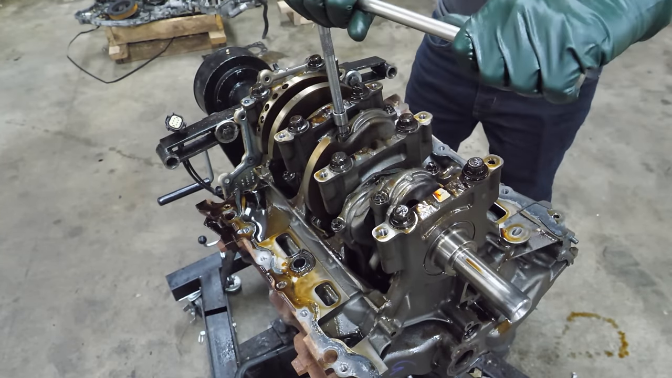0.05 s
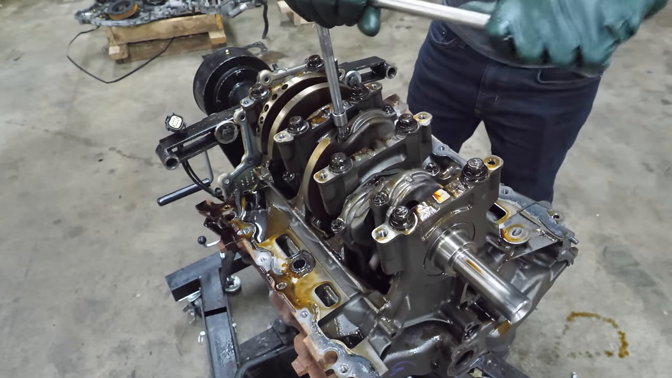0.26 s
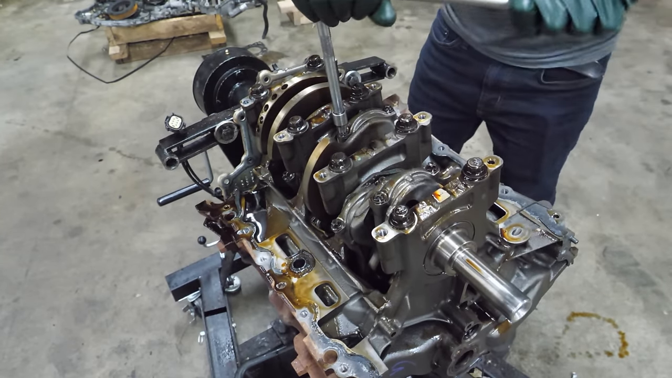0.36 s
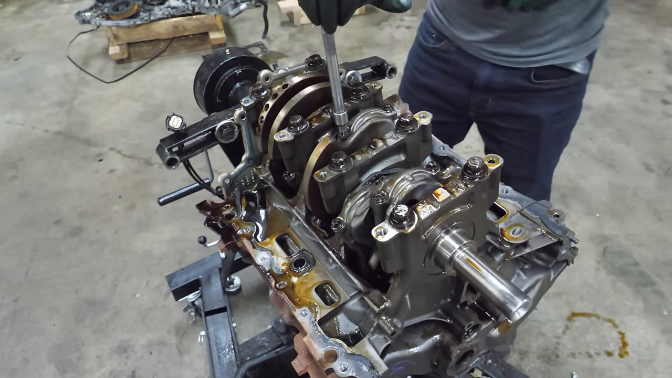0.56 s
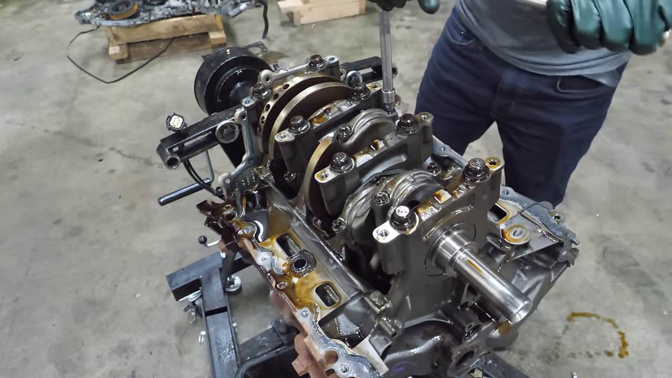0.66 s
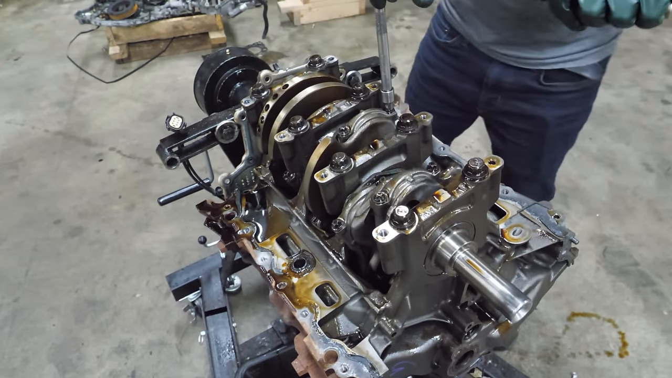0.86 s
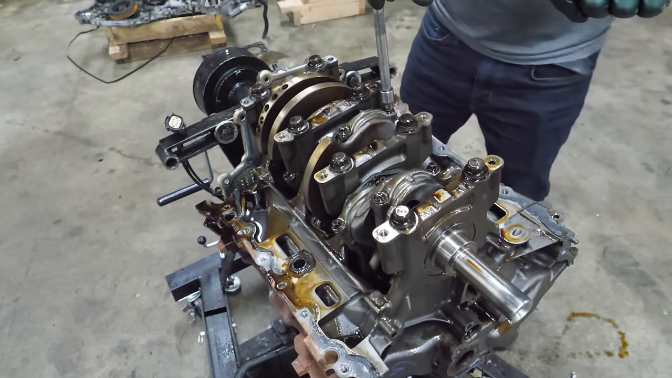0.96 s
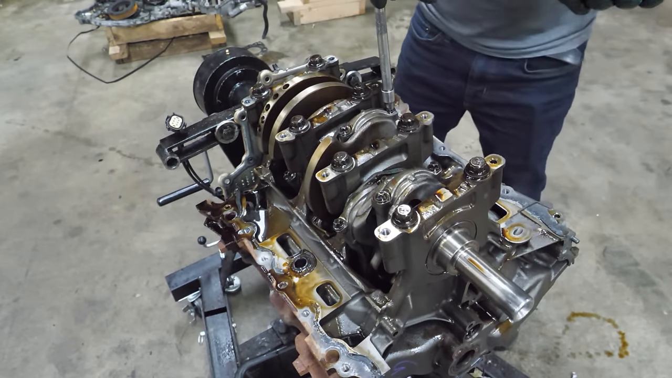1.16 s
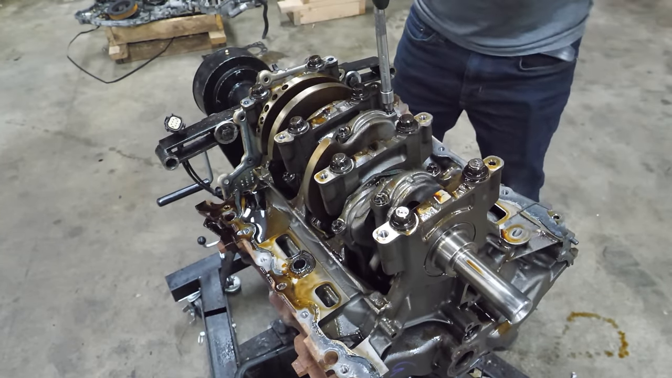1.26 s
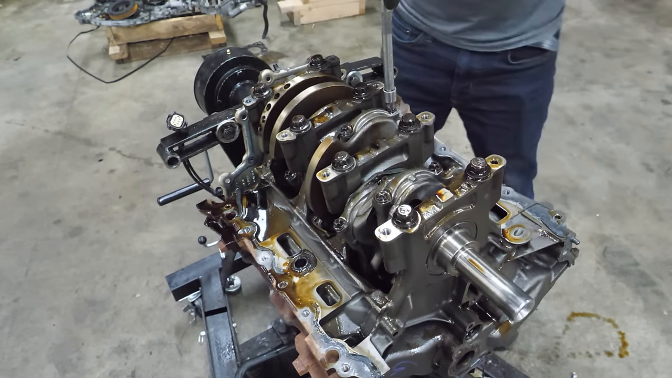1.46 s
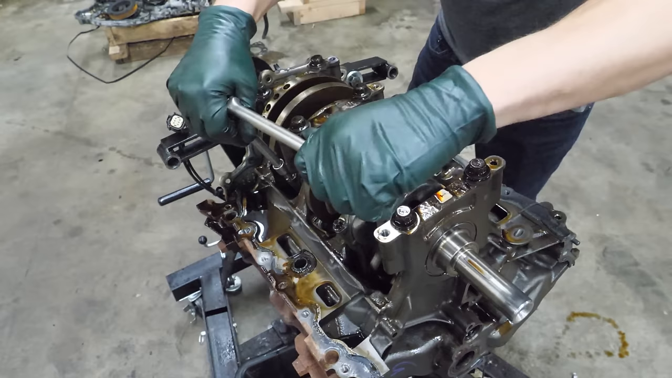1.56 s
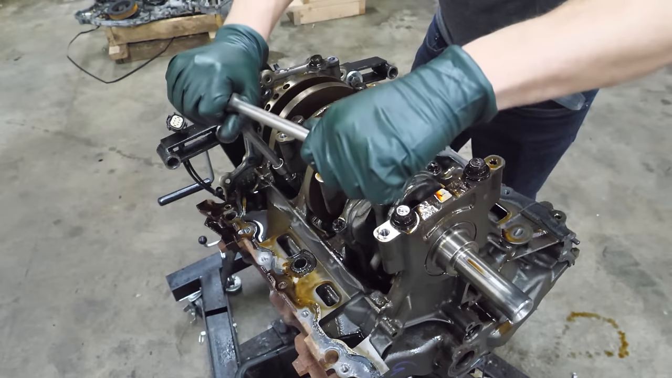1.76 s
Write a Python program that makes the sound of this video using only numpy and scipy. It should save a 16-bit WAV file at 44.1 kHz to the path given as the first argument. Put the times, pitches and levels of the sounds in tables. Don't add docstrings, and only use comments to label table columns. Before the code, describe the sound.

Tight engine bolts break loose with three abrupt metallic cracks, one early and two close together around one second; light socket ticks come between, close up in a bare concrete workshop with a bright ringing echo.

```python
import sys
import numpy as np
from scipy import signal
from scipy.fft import rfft, irfft
from scipy.io import wavfile
from scipy.ndimage import uniform_filter1d

SR = 44100
rng = np.random.default_rng(int(sys.argv[2]) if len(sys.argv) > 2 else 0)


def invert_db(x):
    u = np.asarray(x, float) / 20
    return 10 ** u


def file_out(sig):
    cols = np.atleast_2d(sig).T
    lim = np.clip(cols, -1, 1)
    pcm = np.round(lim * 32767).astype(np.int16)
    wavfile.write(sys.argv[1], SR, pcm)


N = 79380

# (t/s, ring level/dB, snap level/dB, thump level/dB)
CRACKS = [
    (0.2361, -30.5, -11.5, -24),
    (0.919, -34.5, -16, -15),
    (1.1964, -34, -15, -21),
]
# (rise t/s, fall t60/s)
SLIP_BURSTS = [
    (0.0042, .018),
    (0.003, 0.017),
    (0.0021, 0.023),
]
# (f/Hz, width/Hz, level/dB)
FIRST_STEEL = [(1100, 200, -3), (2368, 270, -11), (3650, 470, 1), (4780, 120, -15), (5020, 110, -1.5),
               (5820, 83, 5), (7000, 100, -7.5), (7170, 40, -15), (10500, 91, -17.5), (11030, 180, -25.5),
               (13200, 240, -24)]
SECOND_STEEL = [(2290, 410, -7), (3430, 40, 12), (4020, 260, -10), (4880, 100, 7.5), (6030, 83, -14),
                (6600, 420, -0.5), (7880, 110, -9), (8370, 110, 3.5), (10700, 190, -18), (10800, 200, -23),
                (12100, 130, -21)]
THIRD_STEEL = [(2087, 110, -6), (4045, 73, -7.5), (4620, 69, -10), (5840, 75, 1.5), (6800, 250, -9),
               (7020, 70, -19), (7300, 83, -14.5), (8630, 150, 5), (9100, 140, -39.5), (11000, 260, -4),
               (12670, 150, -39)]
# (f/Hz, width/Hz, level/dB)
BODY_MODES = [
    [(440, 67, -14.5), (3100, 100, -16.5)],
    [(1590, 380, -11), (815, 300, -19)],
    [(3310, 450, -9.5), (420, 200, -17)],
]
# (f/Hz, level/dB)
STEEL_SHEEN = [(7000, 0.7), (9500, -2), (16000, -10)]
# (f/Hz, level/dB)
SNAP_COLOURS = [
    [(290, -37), (500, -11), (2850, -20.5), (3490, -6), (5880, 1.5), (8450, -28.5), (16000, -31.5)],
    [(290, -32), (500, -2.5), (2730, -6), (4940, 1.5), (8700, -8.5), (14900, -19.5), (16000, -26.5)],
    [(290, -38), (500, -10.5), (2570, -13.5), (5800, 2), (7530, -9.5), (8700, -7), (16000, -44)],
]
TICK_TIMES = [
    .6135,
    .771,
    .772,
    .783,
    .8,
    .8415,
    .8415,
    .8555,
    .8555,
]
# (level/dB, centre f/Hz, width/Hz, t60/s)
TICK_TONES = [
    (-45, 3800, 2000, 0.0085),
    (-45.5, 4800, 3200, 0.041),
    (-51.5, 470, 250, 0.025),
    (-49.5, 3850, 2800, 0.058),
    (-60, 2500, 8200, 0.3),
    (-53, 2700, 900, 0.013),
    (-60, 6300, 2300, 0.024),
    (-42, 6200, 6300, .004),
    (-49, 550, 370, 0.023),
]
SCENE_CHANGES = [.62, .912, 1.572]
# (f/Hz, level/dB)
WALL_COLOUR = [(59, -41.5), (100, -11.5), (358, -21.5), (1870, -7.5), (2370, -15.5), (5530, -3),
               (10000, -27.5), (14100, -32), (16000, -51.5)]
# (f/Hz, t60/s)
WALL_DECAY = [(150, 0.28), (500, 0.88), (1100, 0.67), (2500, 0.91), (5500, 0.67), (8000, 0.64),
              (13000, 0.28)]
# (f/Hz, width/Hz, level/dB)
BLOCK_MODES = [(1881, 210, -14.5), (2198, 22, -11.5), (3340, 440, 0), (4820, 50, -1.5), (5570, 220, 5),
               (6790, 77, -4.5)]
# (f/Hz, depth/dB)
ECHO_PATCHES = [(3000, 2), (7500, 2.5), (9000, 7.5), (16000, 9.5)]
ECHO_LEVELS = [-37.5, -39, -40]
ECHO_MIDS = [-2, 0, -5, -0.5]
ECHO_LOWS = [-3, 0, 6, 7]
# (f/Hz, level/dB)
AIR_COLOUR = [(15, -25), (25, -16), (55, -6), (229, 0.5), (575, -8.5), (1790, -11), (2110, -15),
              (3080, -11), (16000, -18)]
# (t/s, level/dB)
AIR_LEVELS = [(0, -5), (0.621, -6.7), (.9, -14.5), (1.573, -5), (1.575, -14), (1.681, -4.5), (1.8, -3)]
# (f/Hz, level/dB)
SIDE_SHARE = [(60, -27), (1000, -23.5), (6000, -26), (8500, -6), (15000, -15.5)]
# (f/Hz, level/dB)
SIDE_AIR_COLOUR = [(25, 4), (900, -3.5), (7300, -4.5), (7900, -35.5), (16000, -42)]


def evened(x):
    return x / np.sqrt(np.mean(x ** 2) + 1e-20)


def read(points, hz):
    f, value = np.transpose(points)
    return np.interp(np.log(hz + 1), np.log(f + 1), value)


def coloured(x, points):
    gain = invert_db(read(points, np.fft.rfftfreq(len(x), 1 / SR)))
    return irfft(rfft(x) * gain, len(x))


def resonate(x, hz, width):
    turn = np.exp(2j * np.pi * hz * np.arange(len(x)) / SR)
    r = np.exp(-np.pi * width / SR)
    return 2 * (turn * signal.lfilter([1 - r], [1, -r], x / turn)).real


def add(mix, s, sound):
    start = round(s * SR)
    end = min([round(c * SR) for c in SCENE_CHANGES if c > s] + [N])
    sound = sound[max(-start, 0):]
    part = mix[max(start, 0):end][:len(sound)]
    fade_out = np.minimum(np.arange(len(part))[::-1] / 90, 1)
    part += sound[:len(part)] * fade_out


def crack(row, slips, steel, colour):
    s, ring_db, snap_db, thump_db = row
    rise_s, fall_t60 = slips
    creak_s, creak_db = 0.0034, -32.5
    narrowest_hz = 110
    t = np.arange(round(.2 * SR)) / SR - creak_s
    creak = invert_db(creak_db) * (1 + t / creak_s) * (t < rise_s)
    fall = invert_db(-60 * np.maximum(t - rise_s, 0) / fall_t60)
    shape = (np.clip(t / rise_s, 0, 1) + creak) * fall
    jolts = rng.standard_normal((2, len(t)))
    drive = shape * jolts[0] * (rng.random(len(t)) < .4)
    ring = 0
    for hz, width, db in steel:
        mode = evened(resonate(drive, hz, max(width, narrowest_hz)))
        ring = ring + invert_db(db) * np.sqrt(width) * mode
    ring = coloured(evened(ring), STEEL_SHEEN)
    snap = shape * evened(coloured(jolts[1], colour))
    blow = thump(np.maximum(t, 0))
    return s - creak_s, invert_db(ring_db) * ring + invert_db(snap_db) * snap + invert_db(thump_db) * blow


def thump(t):
    dip_s, dip_db, push_s = 0.0011, 5.5, 0.0013
    swing_hz, swing_q = 36, 1
    u = np.maximum(t - dip_s, 0) / push_s
    into_dip = np.minimum(t / dip_s, 1)
    suck = invert_db(dip_db) * np.sin(np.pi * into_dip) * into_dip
    push = np.e * u * np.exp(-u) - suck
    w = 2 * np.pi * swing_hz / SR
    a = np.sin(w) / (2 * swing_q)
    return signal.lfilter([1, -2, 1], [1 + a, -2 * np.cos(w), 1 - a], push)


def tick(s, db, hz, width, t60):
    t = np.arange(round(.12 * SR)) / SR
    clicks = 0.52 + (rng.random(len(t)) < .05)
    grit = rng.standard_normal(len(t)) * clicks * np.minimum(t / t60 * 15, 1)
    touch = evened(resonate(resonate(grit, hz, width), hz, width))
    return s, invert_db(db - 60 * t / t60) * touch


def bar_ring(white, t):
    hz, width = 1089, 22
    steady = .7 * np.sin(2 * np.pi * (hz * t + rng.random()))
    return steady + evened(resonate(resonate(white, hz, width), hz, 2 * width))


def echo(level_db, mids_db, lows_db):
    block_db, bar_db, bar_t60 = -10.5, -18, 0.87
    early_db, early_t60, rise_s = 11, 0.069, 0.012
    white = rng.standard_normal(SR)
    block = evened(sum(invert_db(db) * evened(resonate(white, hz, w)) for hz, w, db in BLOCK_MODES))
    wash = evened(coloured(white, WALL_COLOUR)) + invert_db(block_db) * block
    balance = [(250, lows_db), (850, mids_db - 3.5), (1150, mids_db), (2000, mids_db), (3000, 0.0065)]
    wash = coloured(wash, balance)

    hz, t, z = signal.stft(wash, SR, nperseg=256)
    patches = uniform_filter1d(rng.standard_normal(z.shape), size=4, axis=0)
    patches = evened(uniform_filter1d(patches, size=9, axis=1))
    patch_db = read(ECHO_PATCHES, hz)[:, None] * np.minimum(patches, 1)
    t60 = np.clip(read(WALL_DECAY, hz), .05, 3)[:, None]
    z = z * invert_db(patch_db - 60 * t / t60)
    tail = signal.istft(z, SR, nperseg=256)[1][:SR]

    t = np.arange(SR) / SR
    tail = tail + invert_db(bar_db + mids_db - 60 * t / bar_t60) * bar_ring(white, t)
    early = 1 + invert_db(early_db - 60 * t / early_t60)
    return invert_db(level_db) * tail * np.minimum(t / rise_s, 1) * early


def air():
    hush_db, rumble_db, rumble_hz, rumble_width = -60, -65, 45.7, 28
    hush = invert_db(hush_db) * evened(coloured(rng.standard_normal(N), AIR_COLOUR))
    rumble = invert_db(rumble_db) * evened(resonate(rng.standard_normal(N), rumble_hz, rumble_width))
    level_db = np.interp(np.arange(N) / SR, *np.transpose(AIR_LEVELS))
    return hush * invert_db(level_db) + rumble


def off_centre(back):
    spread = coloured(signal.hilbert(back).imag, SIDE_SHARE)
    return spread + invert_db(-76) * evened(coloured(rng.standard_normal(N), SIDE_AIR_COLOUR))


def scene():
    duck_db, duck_s = -13, 0.0052
    back, front, t = air(), np.zeros(N), np.arange(N) / SR
    add(back, -.036, echo(-37.5, ECHO_MIDS[0], ECHO_LOWS[0]))
    add(front, -.018, invert_db(-23.5) * thump(t[:SR // 4]))
    for k, steel in enumerate([FIRST_STEEL, SECOND_STEEL, THIRD_STEEL]):
        s = CRACKS[k][0]
        ducked = (t > s - duck_s) & (t < s)
        back = back * invert_db(uniform_filter1d(duck_db * ducked, size=60))
        add(back, s, echo(ECHO_LEVELS[k], ECHO_MIDS[k + 1], ECHO_LOWS[k + 1]))
        add(front, *crack(CRACKS[k], SLIP_BURSTS[k], steel + BODY_MODES[k], SNAP_COLOURS[k]))
    for s, tone in zip(TICK_TIMES, TICK_TONES):
        add(front, *tick(s, *tone))
    side = off_centre(back)
    return np.array([back + front + side, back + front - side])


def roll_off(x):
    return signal.sosfilt(signal.butter(12, 16490, fs=SR, output="sos"), x)


def record(dry):
    edge_hz = 15700
    mix = signal.oaconvolve(dry, signal.firwin(255, edge_hz, fs=SR)[None], "same")
    return roll_off(mix)


dry = scene()
out = record(dry)
file_out(out)
```